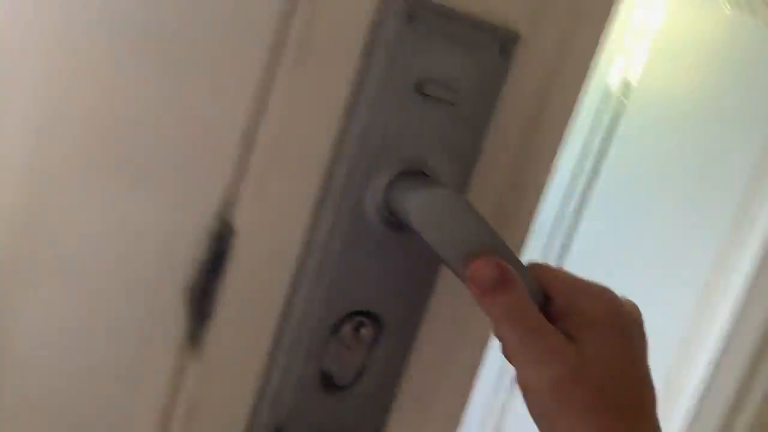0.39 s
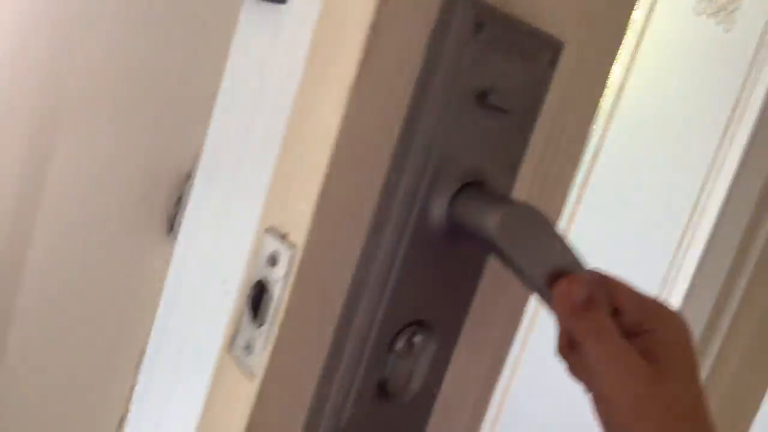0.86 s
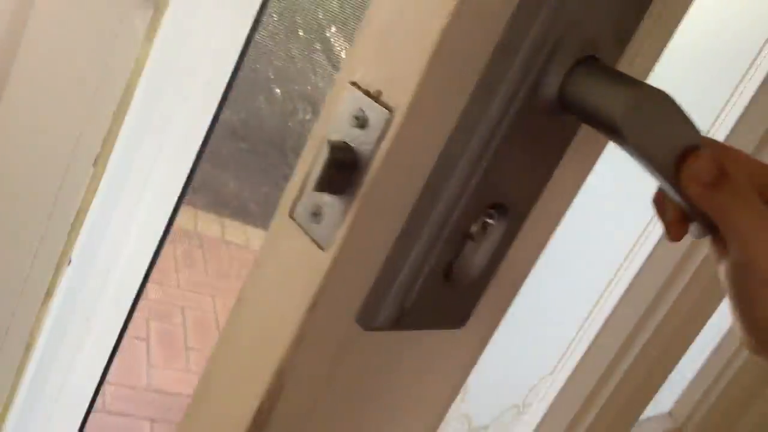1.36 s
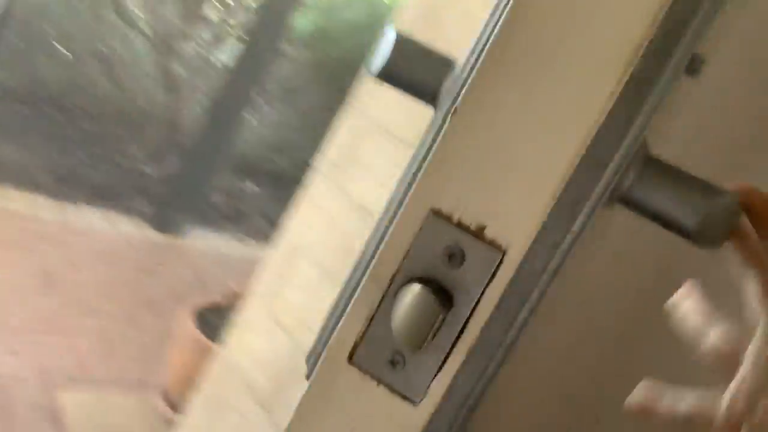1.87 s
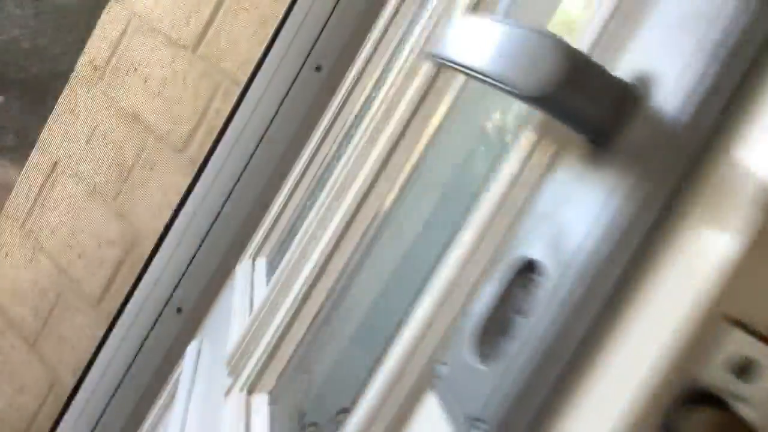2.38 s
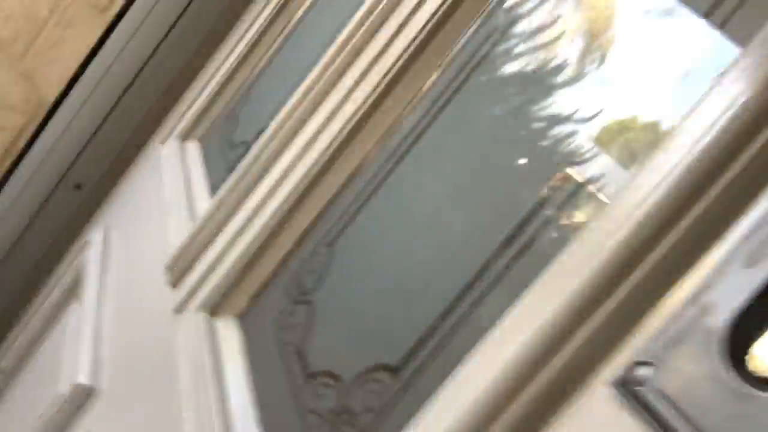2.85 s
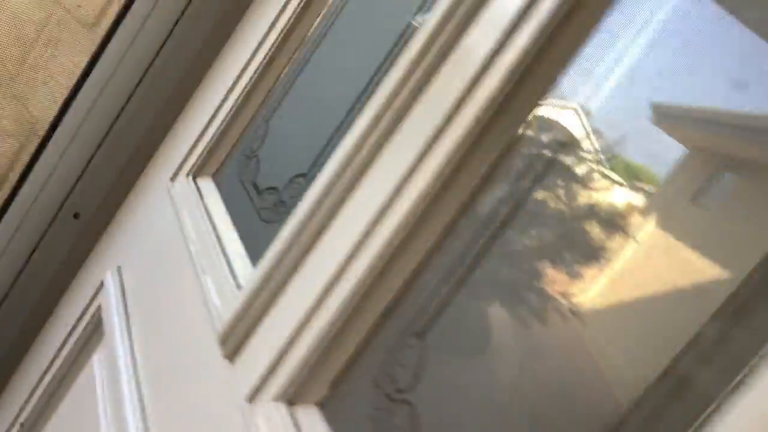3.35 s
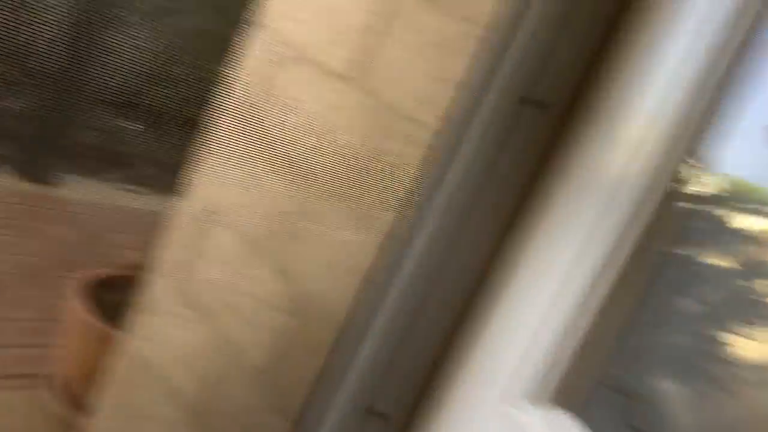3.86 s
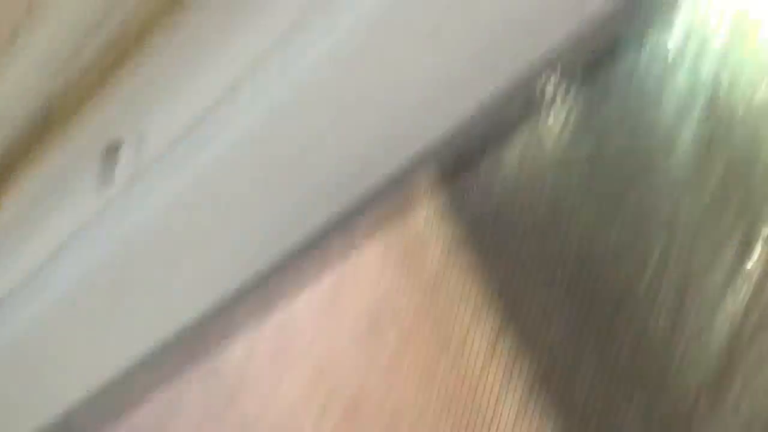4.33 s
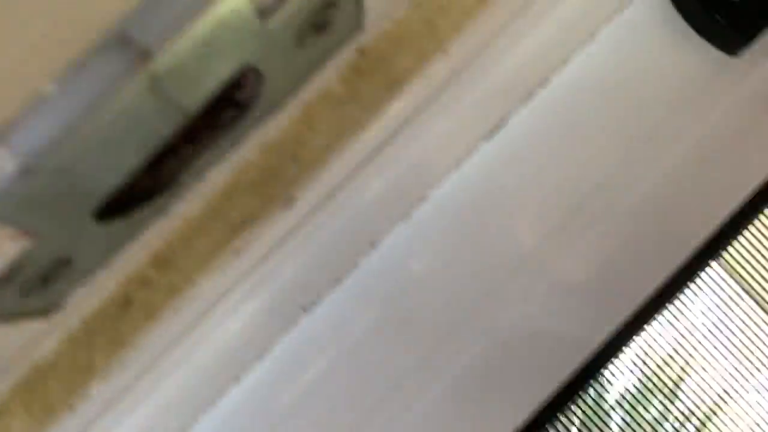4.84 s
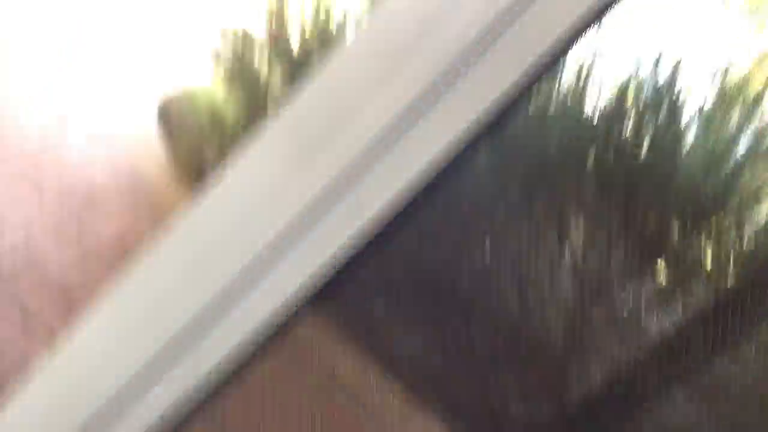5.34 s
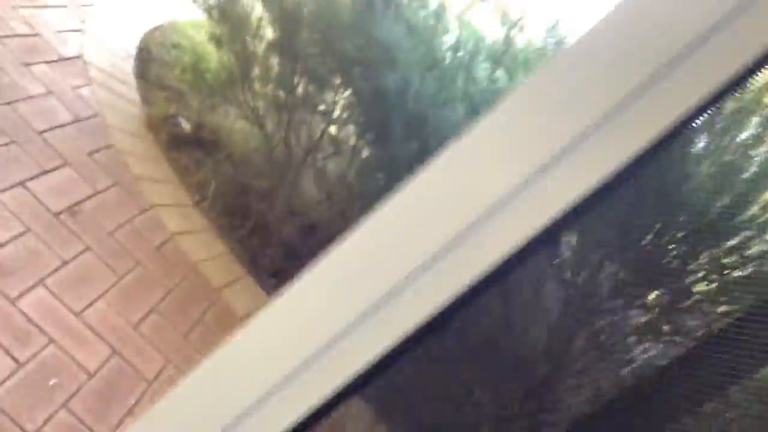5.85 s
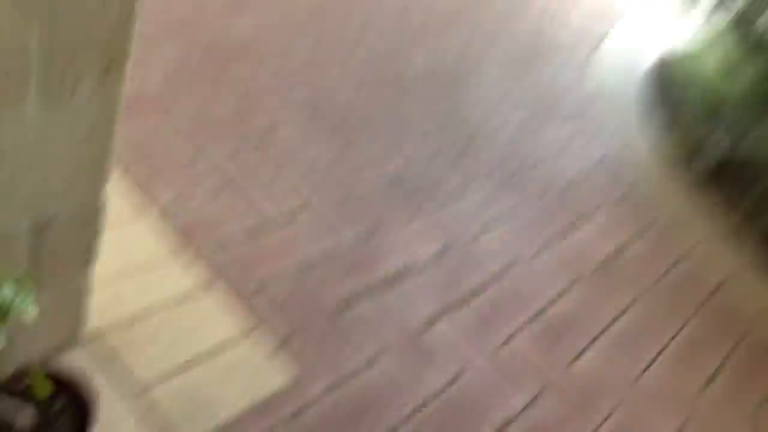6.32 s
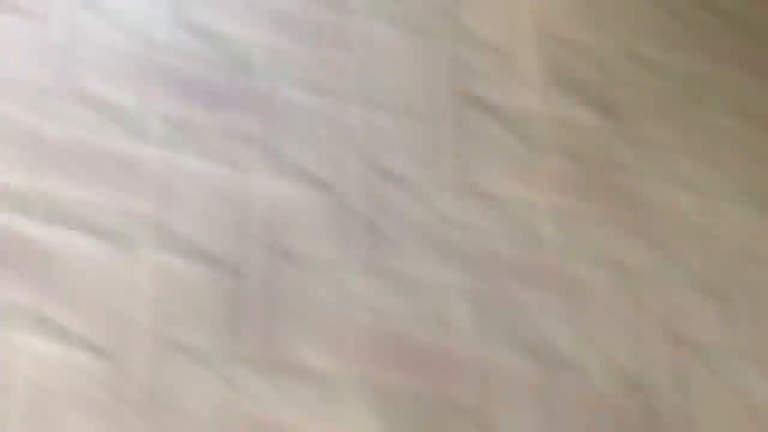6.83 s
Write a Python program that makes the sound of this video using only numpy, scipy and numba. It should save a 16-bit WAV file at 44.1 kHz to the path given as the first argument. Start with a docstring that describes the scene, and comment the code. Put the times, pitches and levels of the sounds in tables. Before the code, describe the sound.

Fingers and cloth rub and knock a hand-held phone as it is carried out through a doorway, with clicks, scuffs and dull thuds.

```python
"""Doorway with a quiet room tone; a hand-held phone is carried out through it. Steps and bumps jolt the case:
push-rebound pulses. Fingers tick, skip and judder on it: noise crackles, snaps and slowing harmonic shakes.
Skin and cloth rub over the microphone: uneven noise grains, filtered. Airborne clacks ring its port: damped sines.
The phone's band-splitting filters delay the bass, so every jolt falls in pitch; a limiter holds the peaks."""
import sys
import numpy as np
from scipy import signal
from scipy.fft import rfft, irfft
from scipy.io import wavfile
from scipy.ndimage import uniform_filter1d, minimum_filter1d
from numba import njit

SR = 44100
rng = np.random.default_rng(int(sys.argv[2]) if len(sys.argv) > 2 else 0)


def undo_db(level):
    """Turn decibels back into plain size, where 20 dB means ten times bigger."""
    steps = np.asarray(level, float) / 20
    return 10 ** steps


def pcm_store(signal):
    """Save signal as 16-bit PCM."""
    levels = np.round(np.clip(np.atleast_2d(signal), -1, 1) * 32767)
    wavfile.write(sys.argv[1], SR, levels.astype(np.int16).T)


N = 317670
TIME_S = np.arange(N) / SR
FREQ_HZ = np.fft.rfftfreq(2 ** 19, 1 / SR)

# room tone spectrum: freq_hz, level_db
ROOM_COLOUR = [(24, -42), (40, 6), (297, -16.5), (354, -21), (467, -3), (1550, -22), (2000, -15),
               (2260, -6), (2570, -11), (3560, -28), (5050, -23), (5440, -22), (6330, -27), (7170, -26),
               (16000, -50)]
ROOM_DB = -52.5
# background level shifts, ducked by the phone's gain control after loud hits, one slight rise:
# centre_s, shift_db, half_width_ms (1/e)
ROOM_SHIFTS = [(2.02, -10, 39), (4.37, 3, 40), (5.71, -5, 31)]
# resonances of the microphone port, strongest near 2.3 kHz: freq_hz, level_db, t60_s
PORT_MODES = [(1950, -19, 0.013), (2186, -5, 0.036), (2390, -2.5, 0.022), (2507, 0.5, 0.024),
              (2794, -8, 0.038), (5300, -34, 0.022)]
# airborne clacks: start_s, relative_level_db, decay_ms (1/e)
CLACKS = [(.0094, -34.5, 57), (.0742, -35, 13), (1.529, -30, 11), (1.798, -32, 13), (1.8437, -31.5, 40),
          (3.196, -30, 8.8), (3.362, -23, 3.6), (4.825, -21.5, 13), (4.935, -36, 8), (4.973, -32.5, 19),
          (5.1483, -24, 19), (5.191, -23.5, 7.6), (5.2057, -15.5, 9.5), (5.221, -22, 30),
          (5.697, -36.5, 6.4), (6.3724, -19.5, 5.6), (6.468, -13, 11), (6.832, -17, 4.6)]
# rumble while carried, at a scuff of -35 dB: time_s, level_db
CARRY_RUMBLE = [(0, -56), (.43, -47), (1.2, -72), (1.78, -44), (2.05, -53), (2.4, -42), (3.35, -55),
                (3.58, -56), (3.64, -25), (3.85, -28), (4.2, -11.5), (4.4, -22), (4.66, -25), (4.74, -22),
                (4.84, -35), (4.92, -20), (5.0, -54), (5.45, -42), (5.7, -55), (5.95, -43), (6.02, -17),
                (6.17, -47), (6.351, -20), (6.6, -40), (6.88, -19), (7.0, -26), (7.2, -31)]
# rumble spectrum: freq_hz, level_db
RUMBLE_COLOUR = [(30, -74), (60, -8), (110, -6), (200, -15.5), (350, -56)]
# strokes over the microphone: peak_s, scuff_db, hiss_db, swell_ms, fade_ms (scuff, 20 dB; at least 5 ms)
STROKES = [(0.05, -41, -62, 600, 900), (0.36, -50, -43.5, 700, 62), (0.528, -50.5, -47.5, 107, 96),
           (0.894, -49, -62.5, 102, 352), (0.99, -55, -54.5, 200, 45), (1.2, -56, -65.5, 700, 379),
           (1.316, -44.5, -51.5, 70, 135), (1.515, -37, -45.5, 94, 166), (1.74, -28.5, -47, 37, 50),
           (1.847, -34, -44.5, 119, 152), (1.947, -23, -46, 74, 27), (2.172, -28, -41, 105, 153),
           (2.289, -39.5, -51, 290, 23), (2.372, -32.5, -57, 50, 53), (2.434, -27, -45, 29, 123),
           (2.529, -40, -46.5, 195, 32), (2.769, -28.5, -42, 124, 80), (2.971, -29.5, -43.5, 115, 138),
           (3.058, -42, -52, 126, 125), (3.271, -36, -47, 300, 139), (3.509, -27.5, -40, 158, 73),
           (3.628, -31, -43, 29, 115), (3.71, -35, -56, 117, 77), (3.793, -20.5, -27.5, 51, 66),
           (3.85, -31.5, -37, 80, 124), (3.941, -26.5, -42, 191, -7), (4.02, -36, -50, 55, 98),
           (4.102, -15.5, -25.5, 97, 170), (4.19, -19.5, -34.5, 120, 61), (4.26, -24.5, -42, 100, 106),
           (4.33, -16.5, -57, 150, 4), (4.43, -33, -50, 55, 80), (4.5, -26.5, -33.5, 103, 76),
           (4.585, -36, -49, 100, 40), (4.716, -20, -26, 105, 151), (4.648, -27, -40, 17, 145),
           (4.849, -57, -36, 300, 15), (4.917, -47, -86, 200, 88), (5.11, -42, -45.5, 340, 481),
           (5.217, -36, -50, 202, 197), (5.303, -45, -48, 181, 77), (5.391, -10.5, -28.5, 31, 29.5),
           (5.575, -34, -47, 161, 97), (5.668, -39, -49, 211, 0), (5.785, -37.5, -53, 42, 196),
           (5.92, -45, -52, 200, 200), (5.995, -26.5, -36, 36, 123), (6.07, -32.5, -34, 62, 54),
           (6.161, -28, -34, 113, 132), (6.27, -32, -37, 124, 100), (6.315, -14, -35, 18, 30),
           (6.349, -29.5, -30.5, 60, 100), (6.41, -27.5, -43.5, 78, 100), (6.475, -13, -22, 24, 30.5),
           (6.5, -30, -32, 40, 20), (6.557, -27, -34.5, 42, 51), (6.64, -26, -33.5, 24, 99),
           (6.678, -41, -34, 94, 13), (6.72, -28, -46, 40, 63), (6.78, -23.5, -37.5, 73, 93),
           (6.833, -37, -31, 66, 57), (6.9, -27, -46, 81, 88), (7.0, -20.5, -34, 112, 30),
           (7.06, -35, -45.5, 100, 90), (7.144, -25.5, -34.5, 61, 188)]
# scuff spectrum: freq_hz, level_db
SCUFF_COLOUR = [(120, -3), (250, 1), (420, -1.5), (600, -3), (900, -10.5), (1400, -32), (2500, -32)]
# hiss spectrum: freq_hz, level_db
HISS_COLOUR = [(900, 4), (1500, 0), (2300, 0), (3090, 1), (3900, -3.5), (4600, 1), (5200, -2.5), (5720, -5),
               (7000, -5.5), (9200, -7), (10700, -8.5), (13000, -15.5), (16000, -20)]
# narrow bands in the hiss: freq_hz, width_octaves, relative_level_db
HISS_BANDS = [(3063, 0.048, 3.5), (3880, 0.066, 3), (4670, 0.028, -5), (5694, 0.11, 1.5)]
# band levels against the hiss: time_s, narrow_db, broad_3khz_db
BAND_LEVELS = [(0, -28, -15.5), (2.1, -26, -7), (2.47, -2, -7.5), (3.0, -16, -6), (3.9, -18, -7),
               (4.4, -16, -23), (5.3, -29, -21), (5.6, -8, -15), (6.05, -22, -18), (6.18, -15, -1),
               (6.3, -23, -16), (6.47, -16, -4.5), (6.55, -25, -18), (7.2, -29, -16)]
# case rings under random bumps: freq_hz, width_octaves, relative_level_db, bumps_per_s
BUMPS = [(264, 0.36, -9, 60), (420, 0.27, -4, 110), (583, 0.29, -9.5, 90), (970, 0.18, -17.5, 90)]
# finger judders: start_s, length_s, start_slips_per_s, end_slips_per_s, relative_level_db
JUDDERS = [(1.495, 0.029, 115, 94, -16), (3.762, 0.035, 154, 120, -12.5), (5.36, 0.052, 146, 90, 0),
           (6.011, 0.036, 143, 67, -22)]
# finger skips, runs of ticks: start_s, end_s, ticks_per_s, relative_crackle_db, relative_snap_db
SKIPS = [(4.214, 4.339, 110, -20, -15), (4.665, 4.73, 51, -30, -15), (5.3505, 5.403, 119, -21.5, -10.5)]
# hard ticks: time_s, relative_crackle_db, bright_offset_db, decay_ms (1/e), relative_snap_db
TICKS = [(0.9323, -21, -1, 2, -13), (1.653, -35, -4, 1.4, -24), (1.678, -35, -5, 1.9, -24),
         (1.707, -33, -12, 1.2, -37), (1.7225, -30, -16, 1.2, -40), (1.7385, -11, -7, 3.6, -5),
         (1.755, -28, -2, 1.4, -21), (1.78, -26, -8, 1.1, -22), (1.9303, -15, -1, 3.8, 0.5),
         (1.948, -9.5, 9.5, 4.6, 0.5), (2.664, -29, -5, 1.1, -22), (2.678, -28, -15, 1.4, -21.5),
         (3.1988, -25, -19, 0.97, -27), (3.3647, -33, 18.5, 2, -16), (3.6787, -12.5, -6.5, 0.76, -16.5),
         (3.704, -36, -10, 1.2, -23), (3.7444, -28, -12, 1.2, -38), (3.7533, -27, -22, 1.3, -0.5),
         (3.795, -17, 5, 1.6, -3), (3.8798, -18, -19, 3.3, -8.5), (3.94, -25, -4, 1.2, -12.5),
         (3.9882, -46, -21, 1.2, -15.5), (4.0976, -5, 3, 1.7, 1), (4.1178, -7, -2, 4.8, -4),
         (4.1542, -1.5, -5, 4.7, -5), (4.174, 0, -5, 0.53, 0), (4.19, -10, 4, 2.2, -32),
         (4.1996, -8, -3, 1.3, -32), (4.271, -16, 1, 1.9, -6), (4.2995, -13, 9, 1.3, -1.5),
         (4.328, -12.5, -3, 1.3, -19), (4.419, -26, -18, 2.2, -25), (4.6314, -9.5, -0.5, 1.3, -40),
         (4.6814, -8, -13, 0.7, -16), (4.6923, -19.5, 9, 1.8, -6), (4.7953, -12.5, -2.5, 1.7, -13),
         (4.911, -11, -5, 1.8, -16), (5.154, -26.5, 8.5, 1.8, -45), (5.2085, -20, 5, 1.7, -37),
         (5.2216, -17.5, 4, 1.2, -20), (5.414, -20, -4, 3.8, -11), (5.7396, -33.5, -8, 2.3, -22.5),
         (5.9893, 5.5, -10, 1.14, -2), (6.016, -25, -12, 1.2, -12), (6.0297, -12.5, 2, 0.78, -15),
         (6.293, -14.5, 0, 1.6, -28), (6.3103, -20, 4, 1.2, -4.5), (6.3253, -20.5, 10, 1.2, 0),
         (6.3914, -20, -19, 1.2, -8.5), (6.4262, -7, 6.5, 2.7, -40), (6.471, -26, 1, 1.1, -19),
         (6.5007, -10.5, 6.5, 1.4, -28), (6.6282, -23, -33, 2.9, -12.5), (6.7648, -18.5, -20, 5.8, -1.5),
         (6.817, -18.5, 6, 1.9, -3), (6.8382, -16, -0.5, 7.8, -13), (6.8845, -18, -1.5, 11, -2),
         (6.9357, -16.5, -6, 8.3, -4.5), (6.9706, -16.5, -1.5, 5.9, -5), (7.131, -18, -15, 1, -8.5),
         (7.146, -16.5, -10, 1.7, -6.5)]
# case jolts: time_s, relative_level_db, pitch_hz, half_width_cycles (1/e, at least 0.2)
JOLTS = [(0.416, -28.5, 70.4, 0.34), (0.717, -15.5, 85.5, 0.57), (0.9336, -12.5, 710, 0.58),
         (1.5109, -16, 102, 1.25), (1.734, -0.5, 358, 0.38), (1.7547, -12.5, 79.5, 1.36),
         (1.9194, -15, 330, 0.81), (1.93, 2, 550, 0.43), (1.9491, 8.5, 473, 0.35), (2.362, -15, 168, 1.03),
         (2.3717, -11, 168, 0.66), (2.3812, -14, 168, 0.66), (2.439, -15.5, 451, 3.4),
         (2.6362, -7.5, 107, 0.51), (2.7752, -17.5, 460, 1.8), (2.8224, -27.5, 81.5, 0.98),
         (3.197, 1.5, 107, 0.46), (3.362, -17.5, 654, 0.9), (3.619, -11, 82, 0.62),
         (3.7552, 11.5, 304, 0.18), (3.7575, -11, 1030, 1.8), (3.791, -1.5, 820, 0.76),
         (3.7986, 5, 271, 0.61), (3.8802, -5, 497, 0.38), (3.8878, -21, 100, 0.96), (3.938, -16, 896, 9),
         (3.9916, -13.5, 198, 0.75), (4.0361, -2.5, 287, 0.26), (4.0703, -26, 616, 1.3),
         (4.0899, 5.5, 420, 0.27), (4.0973, 7.5, 164, 0.65), (4.122, -1, 104.5, 3.5),
         (4.1557, 19, 776, 0.56), (4.1608, -0.5, 140, 0.44), (4.1745, 5.5, 422, 0.4),
         (4.267, -11.5, 162, 3.5), (4.2461, -6, 657, 1.7), (4.2669, -6, 640, 1.4),
         (4.3043, -4.5, 660, 0.81), (4.3264, -11, 144, 0.86), (4.4182, -2.5, 256, 0.17),
         (4.4768, -10.5, 119, 0.81), (4.492, -11, 272, 0.36), (4.6423, -12, 235, 0.63),
         (4.6975, -14, 673, 1.4), (4.7189, -11.5, 153, 3.6), (4.7367, -1.5, 127, 0.21),
         (4.9092, -11.5, 358, 0.34), (5.052, -25, 81, 0.58), (5.158, -15.5, 128, 1.04),
         (5.314, -19.5, 172, 0.56), (5.3726, -0.5, 133, 1.7), (5.4119, -9.5, 395, 0.57),
         (5.4974, -15.5, 79, 0.85), (5.582, -23, 187, 1.5), (5.758, -25.5, 82.6, 0.42),
         (5.9895, 8.5, 420, 0.22), (5.9969, -0.5, 315, 0.44), (6.014, -5, 606, 0.65),
         (6.022, -3, 191, 0.32), (6.213, -18.5, 113.4, 1.2), (6.2345, -7, 148, 0.19),
         (6.2928, -12.5, 950, 0.55), (6.3143, 4, 239, 0.18), (6.3923, -4, 470, 0.73),
         (6.4231, -15.5, 560, 1.3), (6.4559, -14, 563, 0.92), (6.4778, -3.5, 373, 1.5),
         (6.491, -7.5, 471, 0.42), (6.7384, 1.5, 124, 0.55), (6.7621, -4.5, 825, 0.38),
         (6.8005, -3, 330, 0.37), (6.814, 1.5, 554, 0.43), (6.8404, 1.5, 940, 0.29), (6.8764, 1, 166, 0.24),
         (6.8876, 0, 350, 0.22), (6.935, -1.5, 350, 0.63), (6.9687, -5, 284, 1), (6.9947, -15.5, 324, 1.2),
         (7.0045, -13, 720, 0.69), (7.1202, -3.5, 134.5, 0.42)]


def unit(x):
    """Scale to rms 1."""
    return x / np.sqrt(np.mean(x ** 2))


def shape(x, response):
    """Filter by a response given on FREQ_HZ."""
    return irfft(rfft(x, 2 * len(FREQ_HZ) - 2) * response)[:N]


def colour(x, points):
    """Filter by freq_hz, level_db points; rms 1."""
    hz, db = np.transpose(points)
    response_db = np.interp(np.log(FREQ_HZ + 1), np.log(hz), db, left=-60, right=-80)
    return unit(shape(x, undo_db(response_db)))


def band(x, hz, octaves):
    """Bell-shaped band on a log-frequency axis."""
    return shape(x, np.exp(-(np.log2(FREQ_HZ / hz + 1e-9) / octaves) ** 2))


def walk(rate_hz):
    """Random levels held 1 / rate_hz and slewed; rms 1."""
    hold = max(int(SR / rate_hz), 2)
    steps = np.repeat(rng.standard_normal(N // hold + 1), hold)
    return unit(uniform_filter1d(steps, hold)[:N])


def grit(spread_db, flicker_db, rate_hz):
    """Noise of uneven grains whose pressure flickers."""
    level_db = spread_db * rng.exponential(size=N) + flicker_db * walk(rate_hz)
    return rng.standard_normal(N) * undo_db(level_db)


def add(out, s, burst):
    """Mix in a burst centred on time s."""
    i = int(s * SR) - len(burst) // 2
    out[max(i, 0):i + len(burst)] += burst[max(-i, 0):N - i]


@njit
def follow(x, release):
    """Peak follower: rises at once, sinks by a factor per sample."""
    e, out = 0., np.empty(len(x))
    for i in range(len(x)):
        e = max(abs(x[i]), e * release)
        out[i] = e
    return out


def room_tone():
    """Coloured, slowly flickering noise whose level follows the listed shifts."""
    shift_db = sum(db * np.exp(-((TIME_S - s) * 1000 / ms) ** 2) for s, db, ms in ROOM_SHIFTS)
    return undo_db(ROOM_DB + shift_db) * colour(grit(.3, 1.6, 25), ROOM_COLOUR)


def clacks():
    """Each airborne clack is a fading shower of small blows that ring the microphone port."""
    force = np.zeros(N)
    t = np.arange(-4000, 4000) / SR
    for s, db, decay_ms in CLACKS:
        add(force, s, undo_db(db) * (t > 0) * np.exp(-np.abs(t) * 1000 / max(decay_ms, 1)))
    t = t[4000:]
    ring = np.zeros(len(t))
    for hz, db, t60_s in PORT_MODES:
        ring += undo_db(db) * np.sin(2 * np.pi * hz * t) * np.exp(-np.log(1000) * t / t60_s)
    blows = force * unit(grit(1.8, 0.79, 200))
    return undo_db(-23.5) * signal.fftconvolve(blows, ring)[:N]


def carry_rumble(scuff):
    """Low flickering noise of carrying; swells a little with each stroke."""
    level = undo_db(np.interp(TIME_S, *np.transpose(CARRY_RUMBLE)))
    swell = (scuff / undo_db(-35)) ** 0.16
    return level * swell * colour(grit(3.26, 5.7, 12), RUMBLE_COLOUR)


def strokes(hiss_power=1.3, roundness=1.35):
    """Pressure swells to each peak and fades; the hiss swings wider than the scuff."""
    t = np.arange(0, N, 32) / SR
    scuff, hiss = np.full((2, len(t)), 1e-5)
    for s, scuff_db, hiss_db, swell_ms, fade_ms in STROKES:
        side_ms = np.where(t < s, max(swell_ms, 5), max(fade_ms, 5))
        down_db = -20 * (1000 * np.abs(t - s) / side_ms) ** roundness
        scuff += undo_db(scuff_db + down_db)
        hiss += undo_db(hiss_db + hiss_power * down_db)
    return [np.interp(TIME_S, t, v) for v in (scuff, hiss)]


def airy_hiss(grain, scuff, hiss):
    """Treble of the rubbing; brightens as it falls behind the scuff."""
    usual_gap_db, bright_db, bright_db_per_db = 17.5, -4.5, 0.23
    gap_db = np.clip(20 * np.log10(scuff / hiss) - usual_gap_db, -8, 16)
    bright = undo_db(bright_db + bright_db_per_db * gap_db)
    airy = colour(grain, HISS_COLOUR)
    airy = airy + (bright - 1) * band(airy, 10600.0, 0.99)
    s, *columns = np.transpose(BAND_LEVELS)
    narrow, broad = (undo_db(np.interp(TIME_S, s, db)) for db in columns)
    peaks = sum(undo_db(db) * unit(band(grain, hz, width)) for hz, width, db in HISS_BANDS)
    airy = airy + broad * unit(band(grain, 3080.0, 0.27)) + narrow * unit(peaks)
    return hiss * airy


def rubbing(scuff, hiss):
    """Scuff and hiss share one grain, so they flicker together."""
    grain = grit(2.5, 1.2, 120)
    return scuff * colour(grain, SCUFF_COLOUR) + airy_hiss(grain, scuff, hiss)


def crunch(pressure, db, power, per_s, hz, octaves):
    """Random small slips ring a band; power > 1 makes them grow faster than the pressure."""
    slips = (rng.random(N) < per_s / SR) * rng.standard_normal(N)
    return undo_db(db) * pressure ** power * unit(band(slips, hz, octaves))


def bumps(scuff):
    """Random bumps under the rubbing make the case ring briefly."""
    return sum(crunch(scuff, db, 1.246, per_s, hz, width) for hz, width, db, per_s in BUMPS)


def judders():
    """Stick and slip shake the case at a slowing rate."""
    out = np.zeros(N)
    for s, length_s, fast_hz, slow_hz, db in JUDDERS:
        part = np.linspace(0, 1, int(length_s * SR))
        phase = 2 * np.pi * length_s * part * (fast_hz + (slow_hz - fast_hz) * part / 2)
        shake = np.sin(phase) + 0.52 * np.sin(2 * phase) + 0.21 * np.sin(3 * phase)
        envelope = np.sqrt(np.sin(np.pi * part) + 1e-9)
        add(out, s + length_s / 2, undo_db(db) * envelope * shake)
    return out


def skips():
    """Tick rows for each finger skip: nearly even gaps, uneven strength."""
    bright_db, decay_ms, scatter_db = -1.5, 1.7, 4
    rows = []
    for start_s, end_s, per_s, db, snap_db in SKIPS:
        chance = rng.standard_normal((40, 4))
        times = start_s + (np.arange(40) + 0.055 * chance[:, 0]) / per_s
        for s, c in zip(times[times < end_s + .002], scatter_db * chance):
            rows.append((s, db + c[1], bright_db + c[2], decay_ms, snap_db + c[3]))
    return rows


def ticks(dull_hz=2710.0, bright_hz=7800.0, snap_hz=685.0):
    """A single snap of the case plus a crackle of a few milliseconds, with dull and bright shares."""
    dull, bright, snap = np.zeros((3, N))
    t = np.arange(-800, 800) / SR + .0007  # the crackle leads the snap by 0.7 ms
    for s, db, bright_db, decay_ms, snap_db in TICKS + skips():
        fade = (t > 0) * np.exp(-np.abs(t) * 1000 / max(decay_ms, .2))
        burst = fade * rng.standard_normal((2, len(t)))
        # the energy of the fade, whatever the draw
        burst = burst * np.sqrt(np.sum(fade ** 2) / np.sum(burst ** 2, axis=1, keepdims=True))
        add(dull, s, undo_db(db) * burst[0])
        add(bright, s, undo_db(db + bright_db) * burst[1])
        snap[int(s * SR)] += undo_db(snap_db)
    crackle = undo_db(3) * band(dull, dull_hz, 1.05) + undo_db(-8.5) * band(bright, bright_hz, 1.0)
    return crackle + undo_db(23.5) * band(snap, snap_hz, 1.39)


def jolts(edge=1.0, edge_cycles=0.21):
    """A push and rebound of the case, with a sharper edge at the middle, where push turns to rebound."""
    out = np.zeros(N)
    for s, db, hz, width_cycles in JOLTS:
        half = int(5 * SR / hz)
        cycles = np.arange(-half, half) * hz / SR
        push = np.sin(2 * np.pi * cycles) * np.exp(-(cycles / max(width_cycles, .2)) ** 2)
        push += edge * cycles / edge_cycles * np.exp(-np.abs(cycles) / edge_cycles)
        add(out, s, undo_db(db) * push)
    return out


def scene():
    """Sum of all layers; the stroke pressure drives rumble, rubbing, slips and bumps."""
    scuff, hiss = strokes()
    background = room_tone() + clacks() + carry_rumble(scuff)
    slips = crunch(scuff, db=2.0, power=1.618, per_s=450., hz=628.0, octaves=0.79)
    rub = rubbing(scuff, hiss) + slips + bumps(scuff)
    return (background + rub + judders() + ticks() + jolts())[None]


def roll_off(x):
    """The treble ends steeply here."""
    return signal.sosfilt(signal.butter(12, 16820, fs=SR, output="sos"), x)


def record(dry):
    """Bass cut, delay that grows toward the bass, top cut, slow gain control, limiter."""
    delay_s = .004 * (500 / (FREQ_HZ + 60)) ** 1.2
    # phase is the integral of group delay over frequency
    lag = np.exp(-2j * np.pi * np.cumsum(delay_s) * FREQ_HZ[1])
    cut = (FREQ_HZ <= 16000) / np.sqrt(1 + (55 / (FREQ_HZ + 1)) ** 8)
    x = shape(dry[0], lag * cut)
    gain_from_db, gain_power, recover_s = -18.5, 0.15, 0.13
    loud = follow(x, np.exp(-1 / (recover_s * SR))) / undo_db(gain_from_db)
    x = x * uniform_filter1d(np.maximum(loud, 1) ** -gain_power, size=441) * undo_db(1.5)
    ceiling, release_s = .92, 0.0072
    gain = ceiling / np.maximum(follow(x, np.exp(-1 / (release_s * SR))), ceiling)
    # the limiter looks a millisecond ahead
    gain = uniform_filter1d(minimum_filter1d(gain, size=89), size=45)
    return roll_off((x * gain)[None])


dry = scene()
out = record(dry)
pcm_store(out)
```